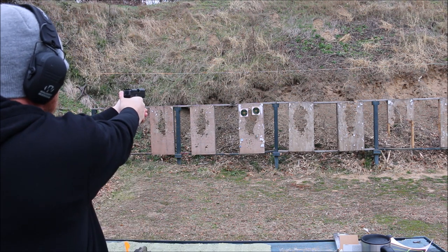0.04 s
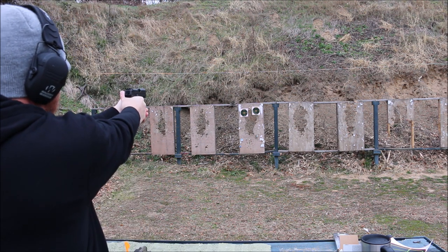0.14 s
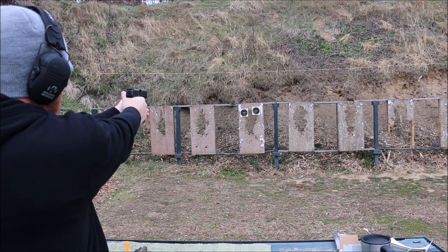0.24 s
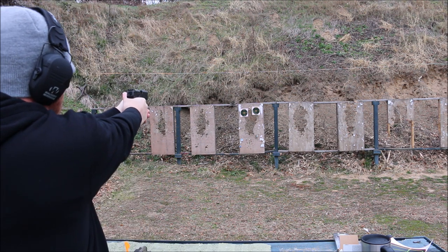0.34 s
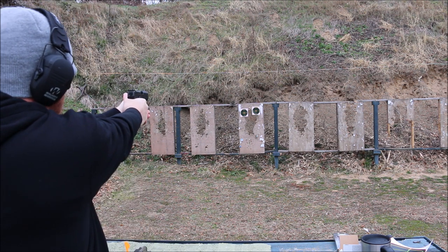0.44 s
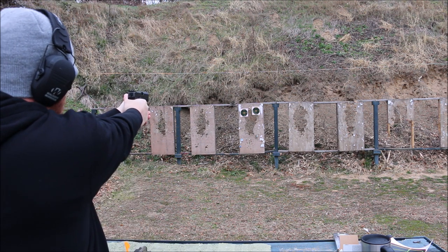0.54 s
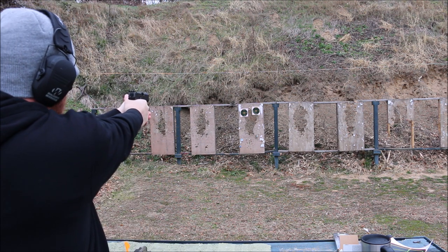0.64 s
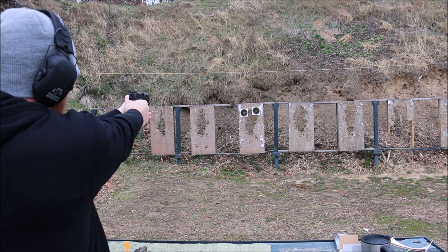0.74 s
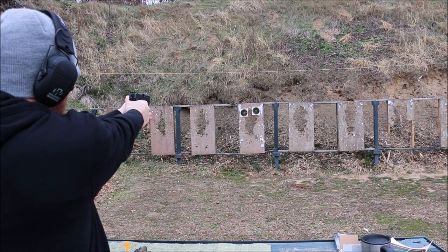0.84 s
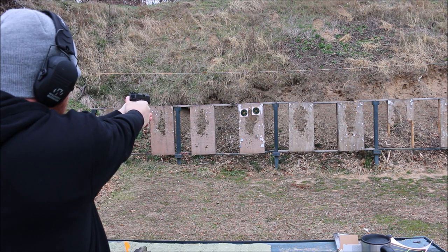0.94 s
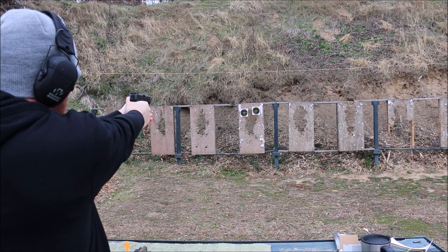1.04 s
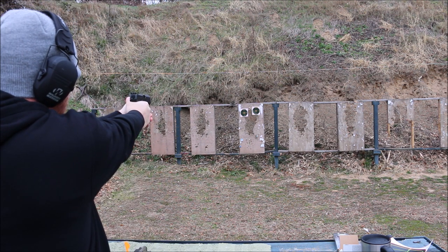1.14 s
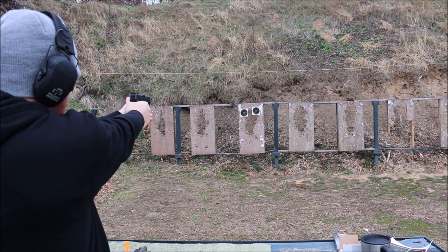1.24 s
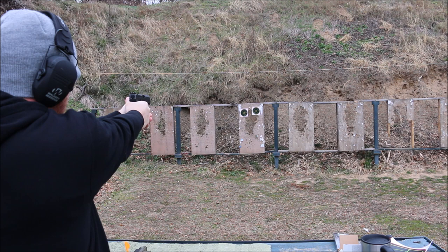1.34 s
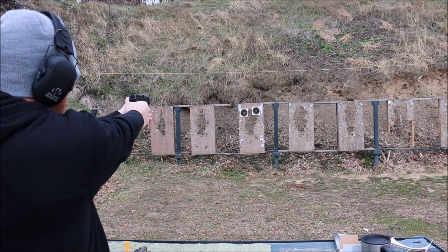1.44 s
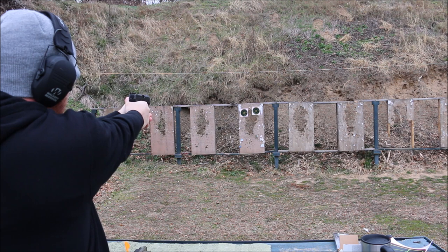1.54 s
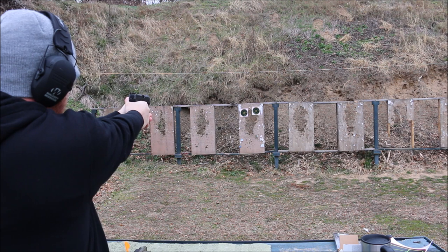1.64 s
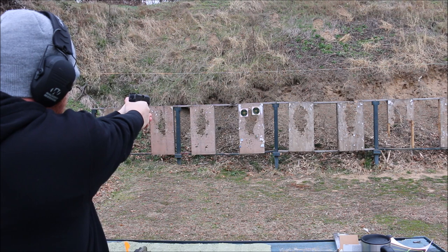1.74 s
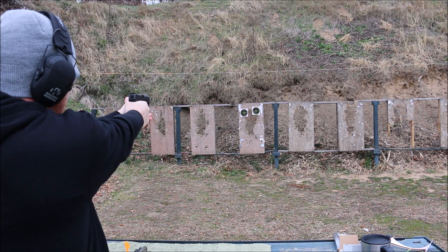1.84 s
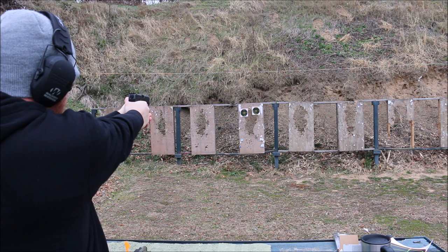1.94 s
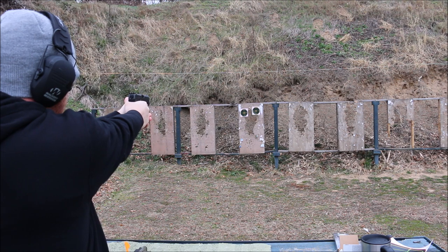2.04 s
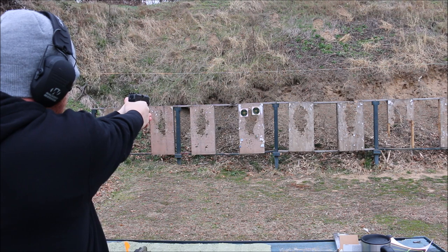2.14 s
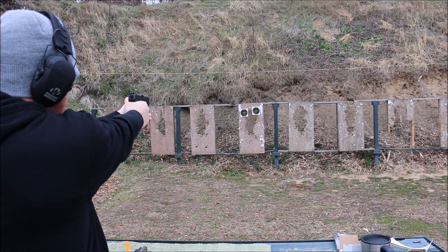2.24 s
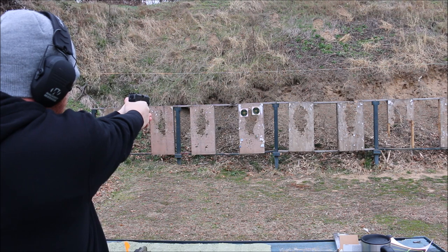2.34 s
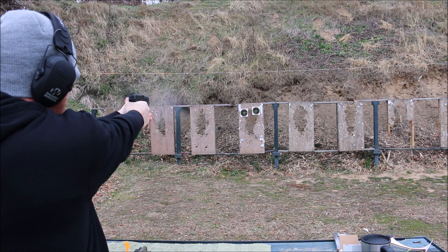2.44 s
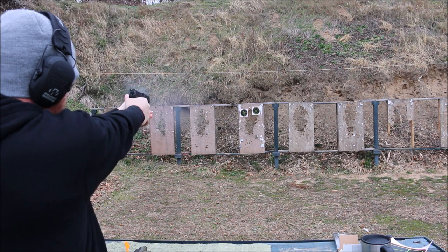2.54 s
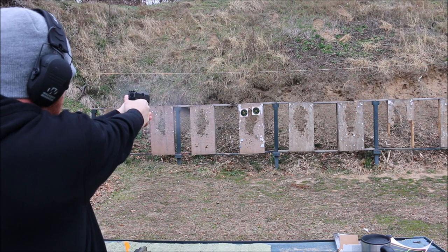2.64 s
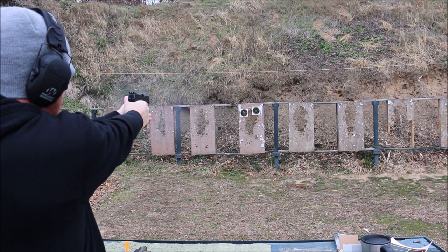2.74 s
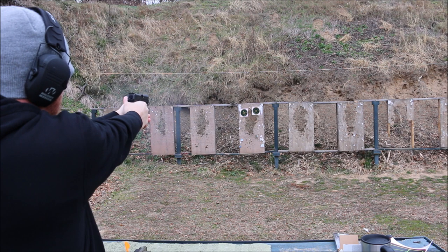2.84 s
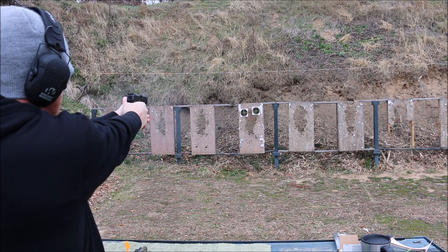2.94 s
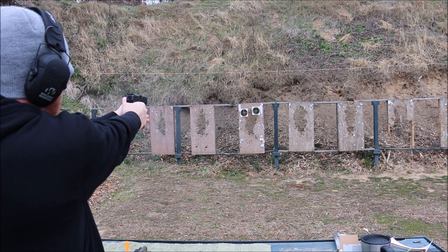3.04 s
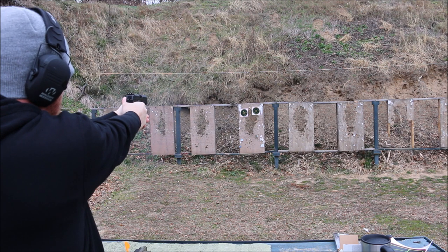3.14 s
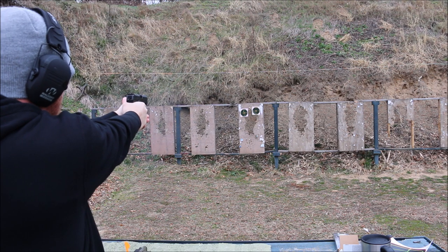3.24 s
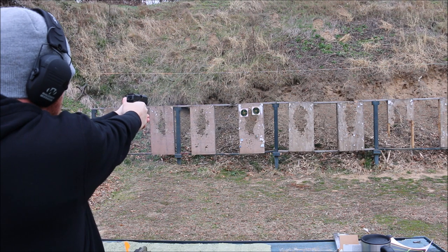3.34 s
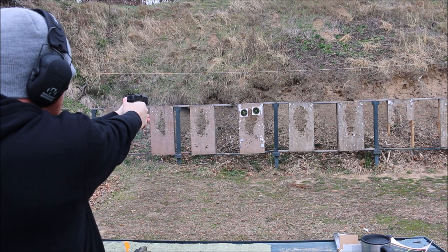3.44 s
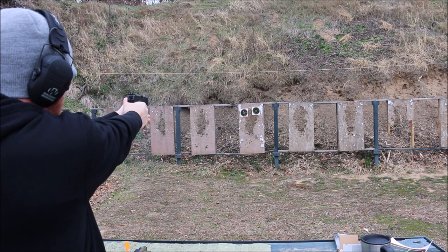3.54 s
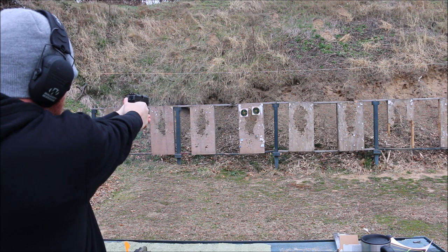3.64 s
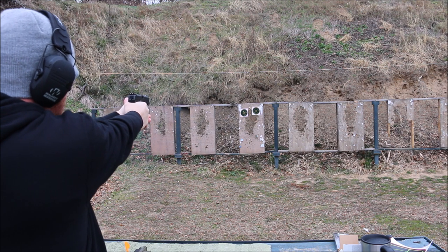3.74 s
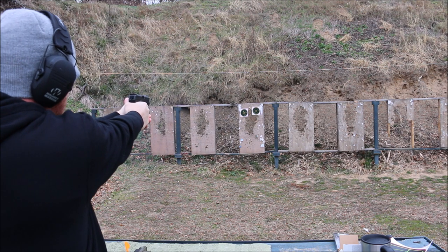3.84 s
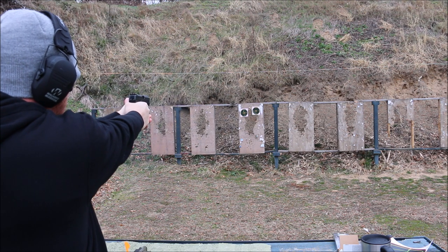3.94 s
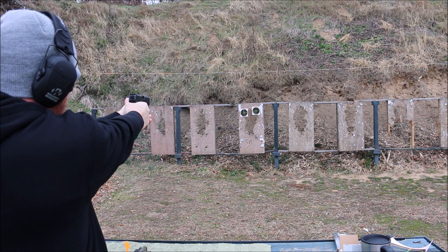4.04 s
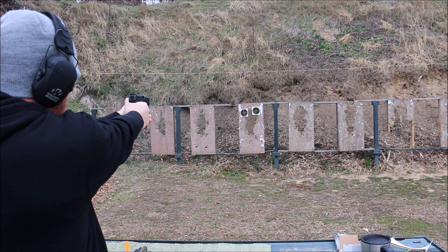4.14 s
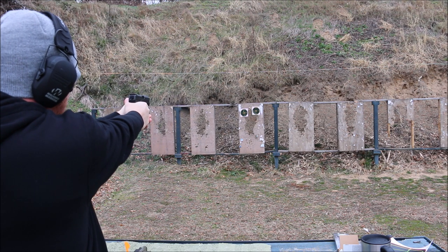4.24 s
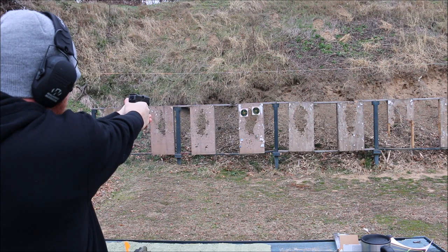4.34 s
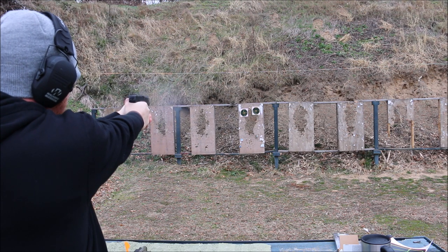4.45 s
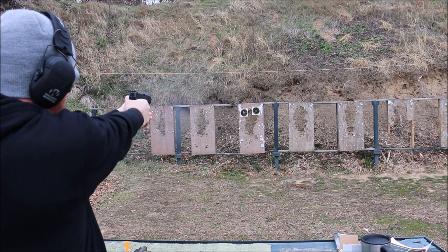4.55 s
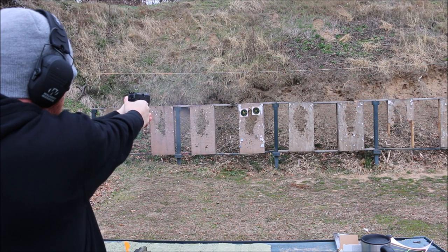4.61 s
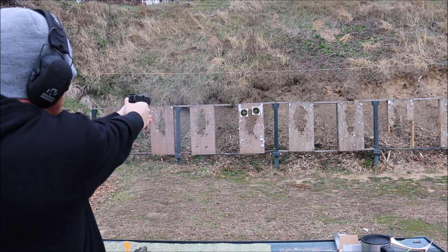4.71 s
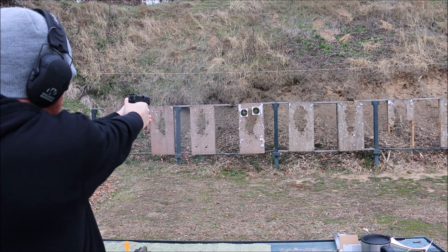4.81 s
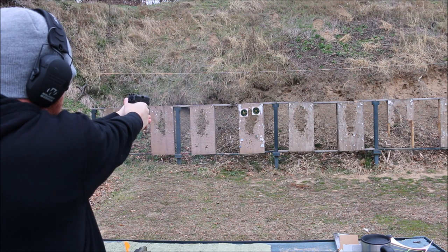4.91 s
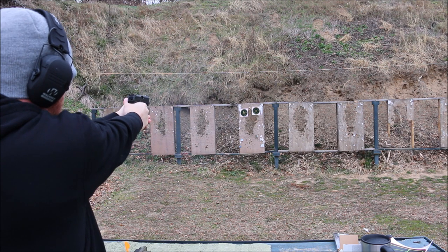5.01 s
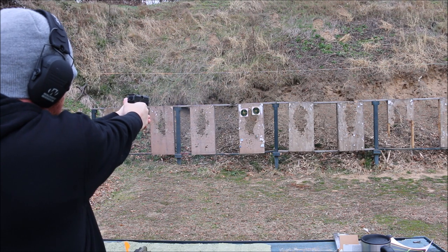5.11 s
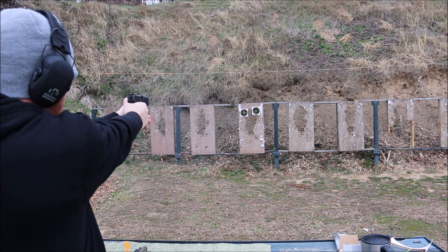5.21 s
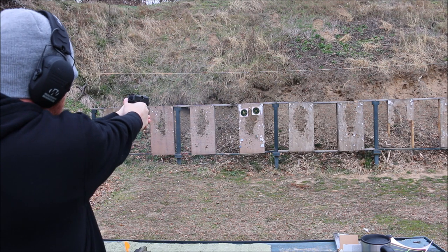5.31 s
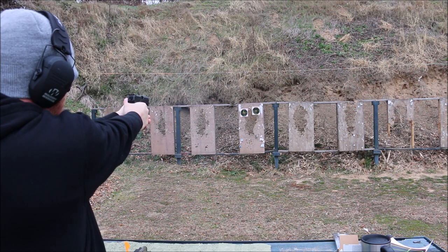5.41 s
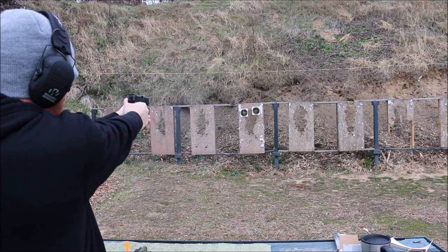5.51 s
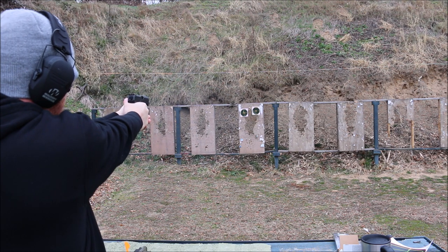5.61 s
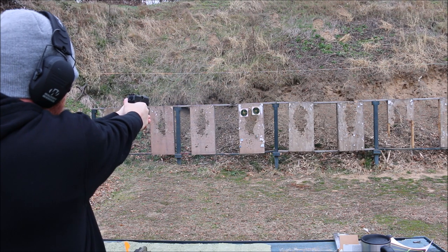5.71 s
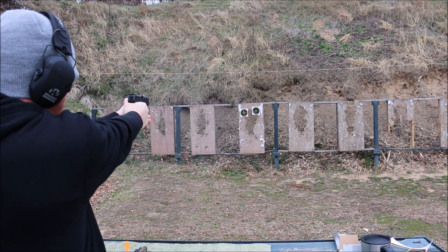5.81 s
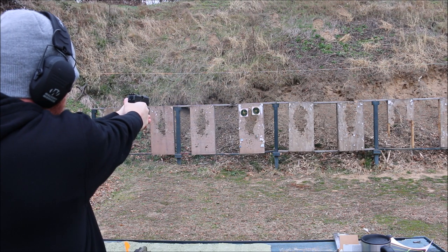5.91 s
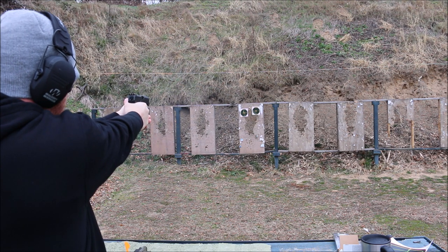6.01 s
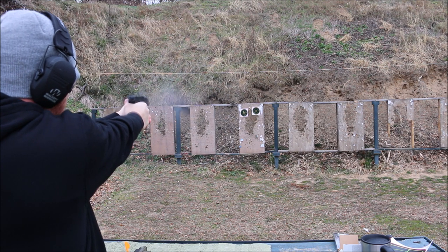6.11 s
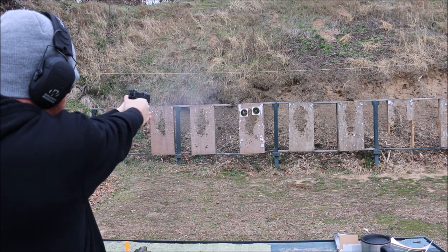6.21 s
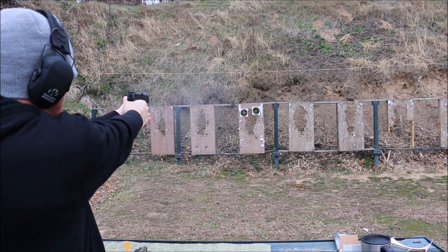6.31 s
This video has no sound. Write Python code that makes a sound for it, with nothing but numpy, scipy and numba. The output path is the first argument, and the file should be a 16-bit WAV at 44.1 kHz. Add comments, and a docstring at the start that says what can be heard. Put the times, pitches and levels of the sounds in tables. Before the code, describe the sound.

Faint outdoor rumble and hiss open the scene, with a very soft sleeve rustle around 0.3 seconds. At 2.4 seconds a pistol fires close by: a sharp crack and boom, quick slaps from the earth backstop and posts, then a hillside echo that rolls on and dulls over about two seconds. The ejected brass case clangs on something hard at 3.0 and lands with a dull tap at 3.6. The pistol gives a small double click at 3.8. A second shot comes at 4.5, followed by a brighter, ringing clang at 5.1, a faint click at 5.4 and another tap at 5.8. A tiny click precedes the third shot at 6.1, whose echo is still sounding at the end. The shots sound nearly identical and sit in the middle; each overloads the microphone and briefly pushes the volume down.

```python
"""Three slow pistol shots crack and boom close by at an outdoor range. The earth backstop and nearby
posts slap each one back, then the wooded hillside rolls on with nearly the same echo every time.
After the first two shots the ejected brass case clangs on something hard and drops with a dull tap.
The pistol clicks between shots; a sleeve rustles over faint outdoor rumble and hiss.
The shots overload the microphone input, and a limiter briefly turns the sound down."""
import sys
import numpy as np
from scipy import signal
from scipy.fft import rfft, irfft, next_fast_len
from scipy.io import wavfile
from scipy.ndimage import uniform_filter1d, map_coordinates
from numba import njit

SR = 44100
rng = np.random.default_rng(int(sys.argv[2]) if len(sys.argv) > 2 else 0)


def wav_record(signal):
    """Record a signal, one row per channel, as 16-bit PCM in the file named by sys.argv[1]."""
    frames = np.transpose(np.atleast_2d(signal))
    bounded = np.clip(frames, -1, 1)
    # unit amplitude maps onto the largest positive 16-bit level
    quanta = np.round(bounded * 32767).astype(np.int16)
    wavfile.write(sys.argv[1], SR, quanta)


N = 280917


def amp(db):
    """Turn decibels into a number to multiply by."""
    return 10 ** (np.asarray(db) / 20)


def unit(x):
    """Scale a signal to an average strength (rms) of 1."""
    return x / np.sqrt(np.mean(x ** 2) + 1e-20)


def along(points, hz):
    """Read between a table's (f/Hz, value) points on a log frequency axis."""
    freqs, values = np.transpose(points)
    return np.interp(np.log(hz + 1), np.log(freqs), values)


def fade(t, t60):
    """Start at t = 0 and die away by 60 dB every t60 seconds (the fade time)."""
    return (t >= 0) * np.exp(-np.log(1000) * np.abs(t) / t60)


def filtered(x, response):
    """Multiply each frequency in x by response(hz)."""
    n = x.shape[-1]
    padded = next_fast_len(n + SR // 4)
    return irfft(rfft(x, padded) * response(np.fft.rfftfreq(padded, 1 / SR)), padded)[..., :n]


def noise(colour, n):
    """Noise of rms 1; the colour table says how strong the lows and highs are."""
    return unit(filtered(rng.standard_normal(n), lambda hz: amp(along(colour, hz))))


def add(track, s, sound):
    """Mix a sound into the track at s seconds."""
    part = track[round(s * SR):][:len(sound)]
    part += sound[:len(part)]


# colour of the background: f/Hz, relative level/dB
AIR_COLOUR = [(12, -48), (20, -5), (95, -4.5), (161, -7), (191, -3.5), (219, -6.5), (315, -9.5),
              (667, -12.5), (725, -11), (1130, -16), (2400, -19), (4070, -20), (15500, -22)]
# how alike left and right are: f/Hz, likeness (1 = the same)
AIR_LIKENESS = [(60, 0.79), (240, 0.87), (950, 0.84), (3770, 0.14), (15000, 0.04)]
def air(level_db):
    """Faint outdoor rumble common to both sides, under each microphone's own hiss."""
    width = lambda hz: np.tan(np.arccos(np.clip(along(AIR_LIKENESS, hz), 0, 1)) / 2)
    shared = noise(AIR_COLOUR, N)
    side = filtered(noise(AIR_COLOUR, N), width)
    return amp(level_db) * np.array([shared + side, shared - side])


# sleeve movements: middle t/s, level/dB, half length/s
RUSTLES = [(0.278, -65.5, 0.025), (0.443, -72, 0.091)]
# colour of rubbing cloth: f/Hz, relative level/dB
CLOTH_COLOUR = [(500, -11), (1400, -9), (2500, -2), (3300, -10), (6000, -15), (16000, -30)]
def sleeve_rustles():
    """Cloth slides softly over cloth on the shooter's arm."""
    t = np.arange(N) / SR
    swells = sum(amp(db) * np.exp(-((t - s) / half) ** 2 / 2) for s, db, half in RUSTLES)
    return noise(CLOTH_COLOUR, N) * swells


# clicks of the pistol's moving parts: t/s, level/dB
CLICKS = [(3.804, -52), (3.8257, -42), (5.363, -52), (6.030, -54)]
# colour of a small metal hit: f/Hz, relative level/dB
CLICK_COLOUR = [(300, -19.5), (1500, 1), (2700, -3.5), (4300, -11.5), (5200, -8), (9000, -23), (16000, -17)]
# tones of the pistol's steel: f/Hz, relative level/dB, fade time/s
STEEL_TONES = [(2720, -5, .012), (4100, -4.5, .02)]
def pistol_clicks(t60):
    """Small steel parts meet with a dry tick and ring for an instant."""
    track, t = np.zeros(N), np.arange(SR // 10) / SR
    ring = sum(amp(db) * np.sin(2 * np.pi * hz * t) * fade(t, life) for hz, db, life in STEEL_TONES)
    for s, db in CLICKS:
        tick = noise(CLICK_COLOUR, len(t)) * fade(t, t60)
        add(track, s, amp(db) * (tick + ring))
    return track


# cases landing on something soft: t/s, push level/dB, thud level/dB
LANDINGS = [(3.6247, -29, -32), (3.627, -32, -52), (5.7987, -14.5, -34), (5.802, -26.5, -70)]
def case_landings(push_s, cutoff_hz, thud_hz, thud_t60):
    """A case lands softly: one rounded push of air and a dead thud."""
    track, t = np.zeros(N), np.arange(SR // 10) / SR
    push = (1 - t / push_s) * np.exp(-t / push_s)
    push = signal.sosfilt(signal.butter(4, cutoff_hz, fs=SR, output="sos"), push)
    push /= np.abs(push).max()
    thud = -np.sin(2 * np.pi * thud_hz * t) * fade(t, thud_t60)
    for s, push_db, thud_db in LANDINGS:
        add(track, s, amp(push_db) * push + amp(thud_db) * thud)
    return track


# cases hitting something hard: t/s, blow level/dB, snap f/Hz, low f/Hz, high f/Hz, brass level/dB
CLANGS = [(3.0272, -10.5, 3040, 580, 3540, -80.5), (5.0671, -11, 3400, 1800, 5030, -32)]
# tones of the struck surface: f/Hz, relative level/dB, fade time/s
SURFACE_TONES = [(786, -17, 0.045), (1130, -13, 0.14), (1400, -8.5, .04), (2100, -19, 0.055),
                 (2750, -13, 0.035), (2920, -4, 0.04), (3780, -13, 0.035), (4250, -10, 0.035),
                 (5200, -5.5, 0.03)]
# tones of the open brass case, the lower two beating together: f/Hz, relative level/dB, fade time/s
BRASS_TONES = [(5259, -13, 0.26), (5340, -12, 0.221), (10920, 3, 0.21)]
def case_clangs(snap_db, snap_t60, rattle_db, rattle_t60, flutter_db, flutters_per_s):
    """A sharp snap rings the surface briefly; the brass case rings on, fluttering as it tumbles."""
    track, t = np.zeros(N), np.arange(SR // 2) / SR

    def ring(tones):
        return sum((-1) ** k * amp(db) * np.sin(2 * np.pi * hz * t) * fade(t, t60)
                   for k, (hz, db, t60) in enumerate(tones))

    for s, db, snap_hz, low_hz, high_hz, brass_db in CLANGS:
        snap = ring([(snap_hz, snap_db, snap_t60)])
        rattle = amp(rattle_db) * noise(CLICK_COLOUR, len(t)) * fade(t, rattle_t60)
        blow = snap + rattle + ring(SURFACE_TONES)
        # the way the case lands decides which pitches sound
        blow = signal.sosfilt(signal.butter(2, low_hz, "high", fs=SR, output="sos"), blow)
        blow = signal.sosfilt(signal.butter(4, high_hz, fs=SR, output="sos"), blow)
        flutter = amp(flutter_db * map_coordinates(rng.standard_normal(200), [t * flutters_per_s]))
        add(track, s, amp(db) * blow + amp(brass_db) * flutter * ring(BRASS_TONES))
    return track


# echoes from the near ground, the hillside and the far woods:
# full at t/s after the shot, level/dB, rise/(dB/s), hold/s, fall/(dB/s)
SLOPES = [(0.011, -13, 1697, 0.012, 131), (.25, -27.5, 61, 0.15, 35.5), (1.4, -56, 15, .2, 27.5)]
# echoes from steep banks: t/s after the shot, level/dB
BANKS = [(0.273, -29.5), (.375, -25), (.444, -25.5)]
def echo_strength(t, bank_half_s=0.012):
    """Each slope's echo swells, holds and dies away; each bank adds a brief bump."""
    slopes = [amp(db - rise * np.maximum(s - t, 0) - fall * np.maximum(t - s - hold, 0))
              for s, db, rise, hold, fall in SLOPES]
    banks = [amp(db) * np.exp(-((t - s) / bank_half_s) ** 2 / 2) for s, db in BANKS]
    return np.linalg.norm(slopes + banks, axis=0)


# colour of the rolling echo: f/Hz, relative level/dB
HILLSIDE_COLOUR = [(30, -54.5), (80, -33), (135, -27), (185, -12), (270, -6), (450, -2), (720, 2),
                   (1050, 2.5), (1500, -6.5), (2200, -5.5), (3200, -10), (5000, -17), (8000, -27),
                   (16000, -22.5)]
def hillside_roll(t, level_db, loss_db_per_s, loss_hz, lumpy_db, patchy_db):
    """Countless small echoes blend; the longer they travel, the more treble the air takes."""
    # single trunks and banks stand out as lumps a few milliseconds long
    lumps = amp(lumpy_db * unit(uniform_filter1d(rng.standard_normal(len(t)), size=260)))
    echoes = filtered(lumps * rng.standard_normal(len(t)), lambda hz: amp(along(HILLSIDE_COLOUR, hz)))
    hz, delay, slices = signal.stft(unit(echoes), SR, nperseg=1024)
    # each stretch of ground returns its own colour
    patches = uniform_filter1d(rng.standard_normal(slices.shape), size=3, axis=0)
    patches = unit(uniform_filter1d(patches, size=5, axis=1))
    travel_s = 4.3 * np.tanh(delay / 4.3)  # the dulling slows down for late echoes
    loss_db = loss_db_per_s * (hz[:, None] / loss_hz) ** 2.02 * travel_s
    roll = signal.istft(slices * amp(patchy_db * patches - loss_db), SR, nperseg=1024)[1][:len(t)]
    return roll * amp(level_db) * echo_strength(t)


# echoes from posts and walls: t/s after the shot, level/dB
SLAPS = [(.0892, 3.5), (0.1026, 1), (.116, -14), (.1705, -8), (0.216, -13)]
# their colour, with little bass because they are small: f/Hz, relative level/dB
SLAP_COLOUR = [(100, -34), (400, 0), (800, 5), (1150, 6.5), (1600, -5.5), (2500, -5.5), (5000, -12.5),
               (16000, -27.5)]
def post_slaps(t, t60, loss_db_per_s, loss_hz):
    """Posts and walls each throw back a short, thin burst; the later, the duller."""
    track, slap_t = np.zeros(len(t)), t[:SR // 20]
    for s, db in SLAPS:
        burst = rng.standard_normal(len(slap_t)) * fade(slap_t, t60)
        colour = lambda hz: amp(along(SLAP_COLOUR, hz) - loss_db_per_s * s * hz / loss_hz)
        add(track, s, amp(db) * filtered(burst, colour))
    return track


# colours of the bright crack and the deep boom: f/Hz, relative level/dB
CRACK_COLOUR = [(100, -37), (700, -18), (1500, 2), (2700, 2.5), (4500, -6.5), (8000, -14), (16000, -21.5)]
BOOM_COLOUR = [(20, -28.5), (70, -30), (160, -8), (260, -11.5), (400, 2.5), (720, 1.5), (1050, -5),
               (1450, -22.5), (2400, -10.5), (5000, -26), (16000, -50.5)]
def blast(t, muzzle_s, backstop_s, push_s):
    """A leading edge, the full muzzle blast, then its return from the earth backstop."""
    crack, boom = noise(CRACK_COLOUR, len(t)), noise(BOOM_COLOUR, len(t))

    def bang(s, crack_db, crack_t60, boom_db, boom_t60):
        return amp(crack_db) * crack * fade(t - s, crack_t60) + amp(boom_db) * boom * fade(t - s, boom_t60)

    def push(s, db):
        """Air is shoved outward, then sucked back."""
        age = np.maximum(t - s, 0) / push_s
        return amp(db) * (t >= s) * (1 - age) * np.exp(-age)

    edge = bang(0, crack_db=-10, crack_t60=0.06, boom_db=-15.5, boom_t60=0.012)
    muzzle = bang(muzzle_s, crack_db=18, crack_t60=0.0093, boom_db=12, boom_t60=0.05)
    backstop = bang(backstop_s, crack_db=3.5, crack_t60=0.016, boom_db=-2.5, boom_t60=0.085)
    return edge + muzzle + push(muzzle_s, db=13.5) + backstop + push(backstop_s, db=7)


# the shots: t/s, relative level/dB
SHOTS = [(2.4434, -0.5), (4.4733, 0), (6.1418, 0.5)]
def pistol_shots(fresh_share):
    """Shooter and landscape stay put, so only a small share of each shot's energy is new."""
    track, t = np.zeros(N), np.arange(round(2.2 * SR)) / SR

    def shot():
        bang = blast(t, muzzle_s=0.0028, backstop_s=0.0482, push_s=0.0014)
        slaps = post_slaps(t, t60=0.011, loss_db_per_s=49, loss_hz=5000)
        roll = hillside_roll(t, level_db=1, loss_db_per_s=15, loss_hz=5040, lumpy_db=1.46, patchy_db=2)
        return bang + slaps + roll

    usual = np.sqrt(1 - fresh_share) * shot()
    for s, db in SHOTS:
        add(track, s, amp(db) * (usual + np.sqrt(fresh_share) * shot()))
    return track


def scene():
    """Everything sits in the middle; only the background differs from left to right."""
    clangs = case_clangs(snap_db=22, snap_t60=0.001, rattle_db=-8, rattle_t60=0.12,
                         flutter_db=7, flutters_per_s=69)
    landings = case_landings(push_s=0.0003, cutoff_hz=3430, thud_hz=364, thud_t60=0.026)
    shots = pistol_shots(fresh_share=0.1)
    return shots + clangs + landings + pistol_clicks(t60=0.013) + sleeve_rustles() + air(level_db=-63.5)


@njit
def limiter_gain(level, threshold, attack_s, release_s):
    """The volume dives while the level is over the threshold and creeps back afterwards."""
    attack, release = 1 / (attack_s * SR), 1 / (release_s * SR)
    gain, volume, peak = np.ones(len(level)), 1.0, 0.0
    for i in range(len(level)):
        peak = max(level[i], peak * (1 - release))
        volume += attack * (threshold / max(peak, threshold) - volume)
        gain[i] = volume
    return gain


def record(dry):
    """The overloaded input flattens the peaks; a limiter, reacting slightly late, turns them down."""
    ceiling, lag_s, top_hz = amp(-3), 0.0025, 15900
    clipped = dry / (1 + np.abs(dry / ceiling) ** 10) ** (1 / 10)
    late_level = np.pad(np.abs(clipped).max(axis=0), (round(lag_s * SR), 0))[:N]
    gain = limiter_gain(late_level, threshold=amp(-13.5), attack_s=0.0025, release_s=0.12)
    # trim the deepest rumble, then the highest treble
    limited = signal.sosfilt(signal.butter(1, 18, "high", fs=SR, output="sos"), clipped * gain)
    return filtered(limited, lambda hz: np.clip((top_hz - hz) / 500 + 0.5, 0, 1))


dry = scene()
out = record(dry)
wav_record(out)
```